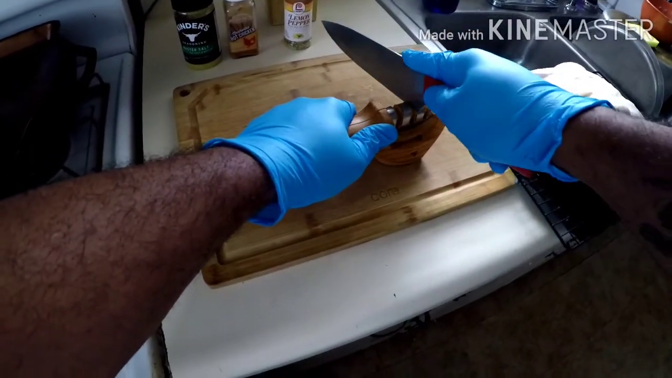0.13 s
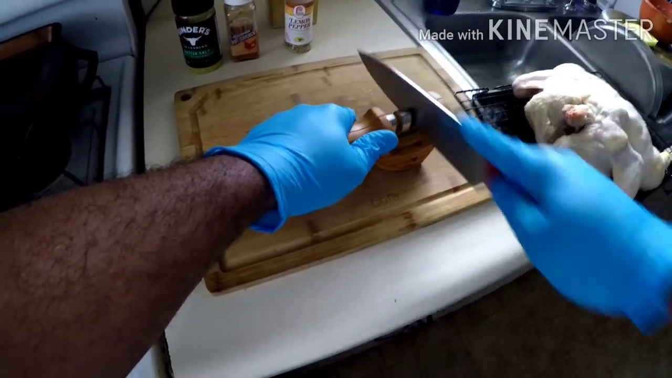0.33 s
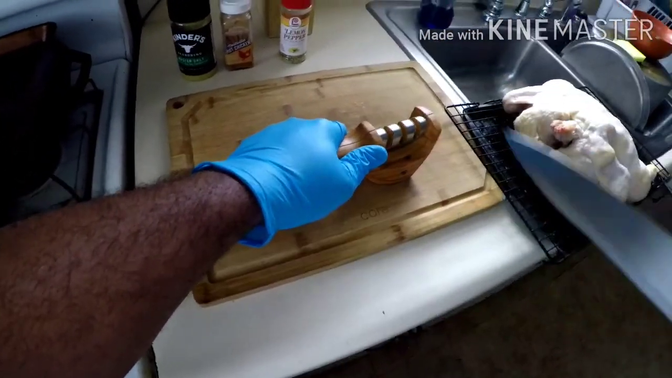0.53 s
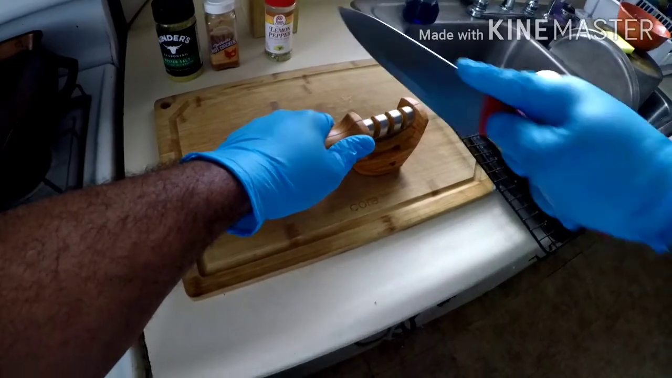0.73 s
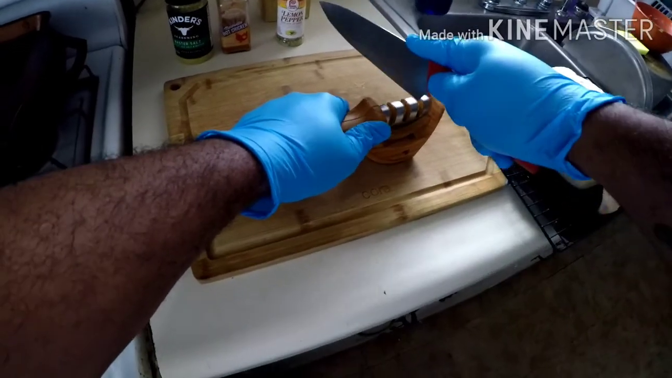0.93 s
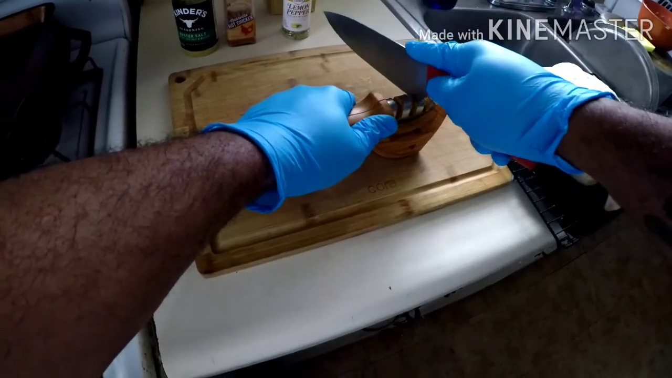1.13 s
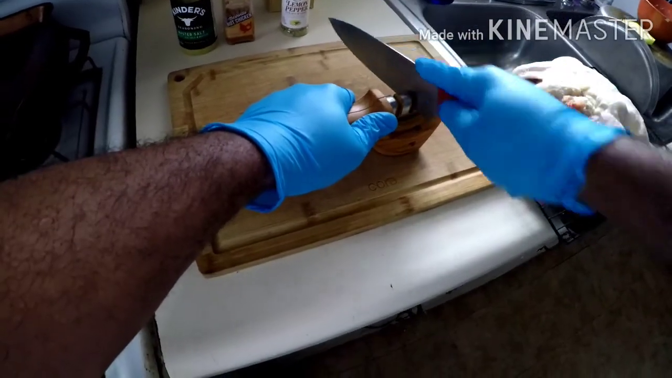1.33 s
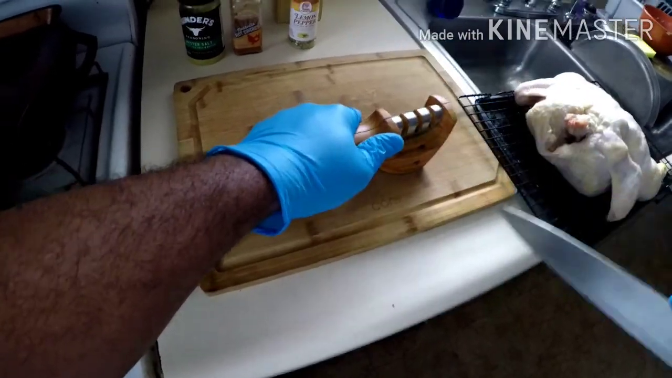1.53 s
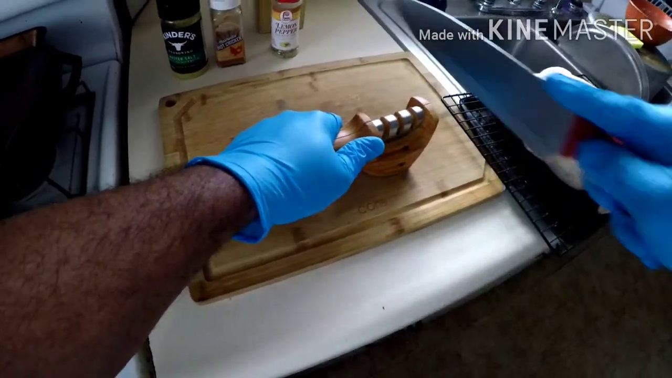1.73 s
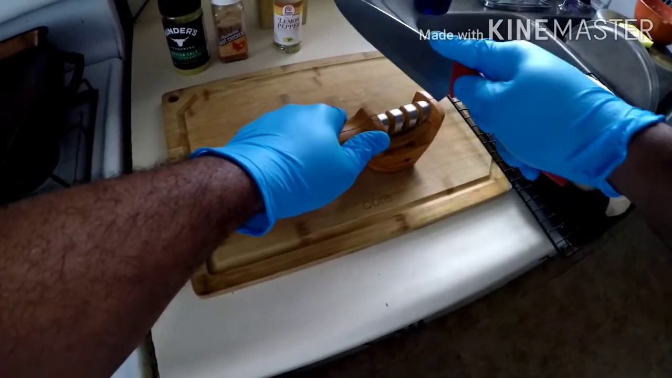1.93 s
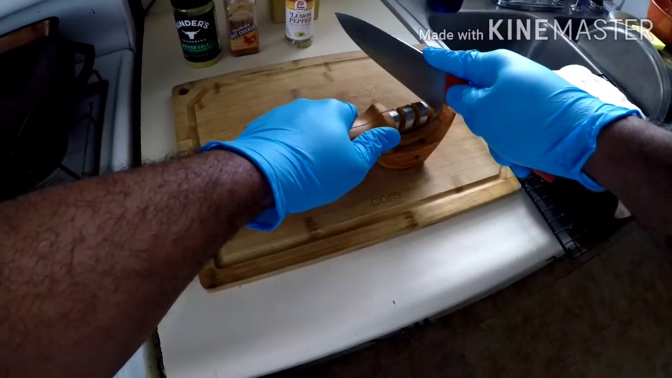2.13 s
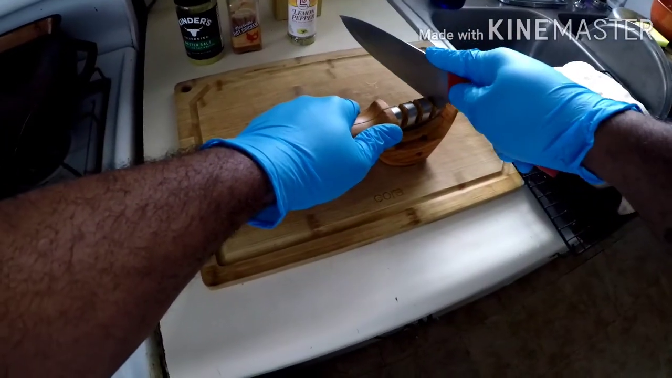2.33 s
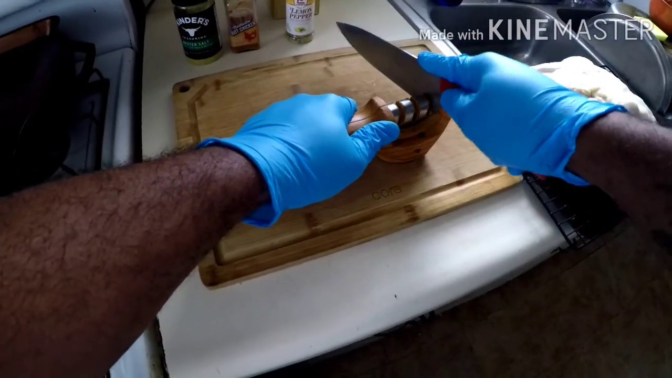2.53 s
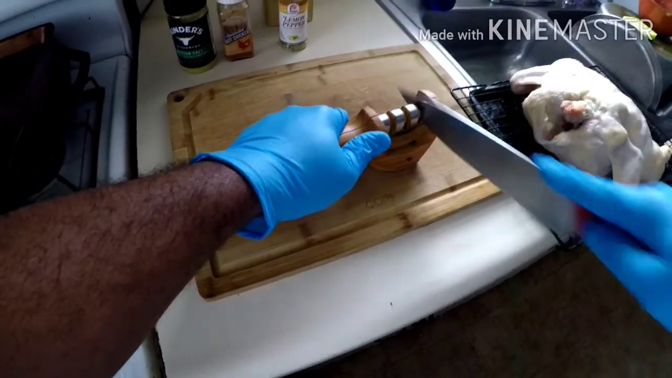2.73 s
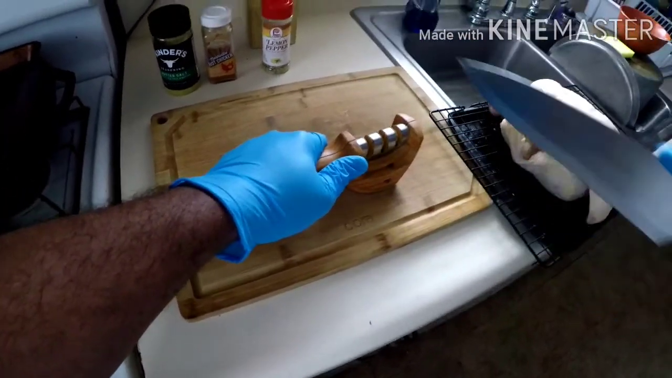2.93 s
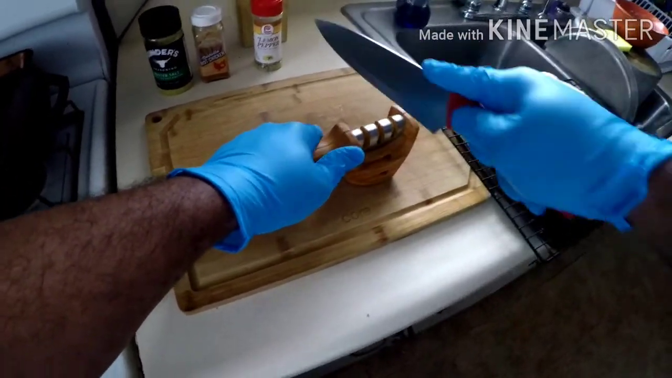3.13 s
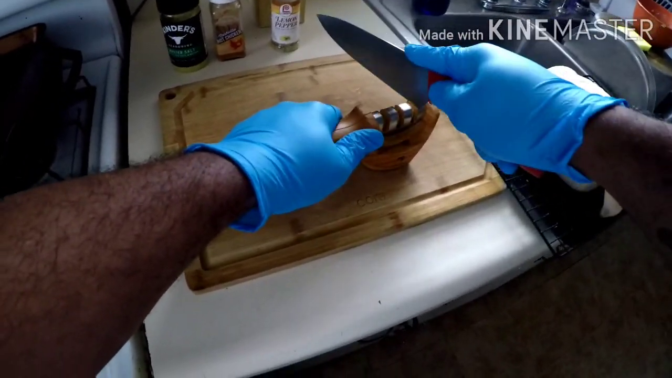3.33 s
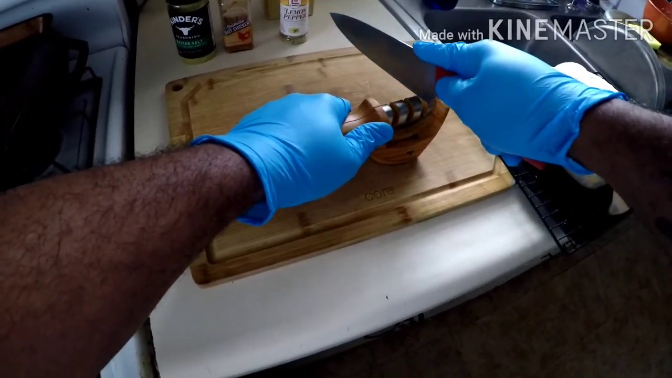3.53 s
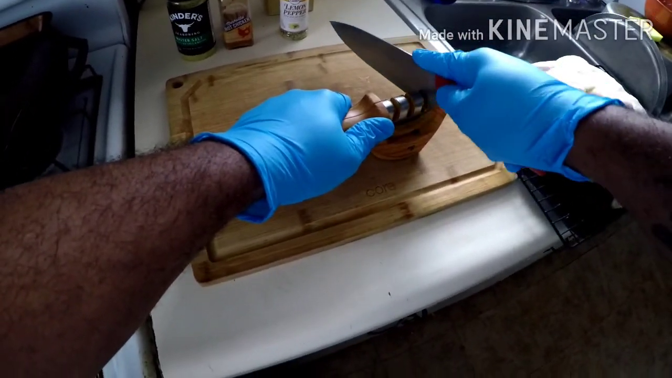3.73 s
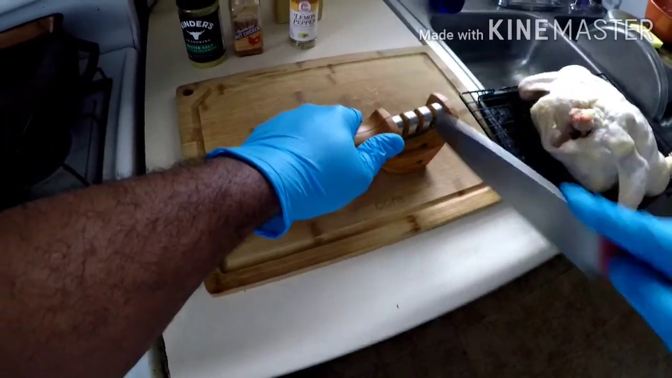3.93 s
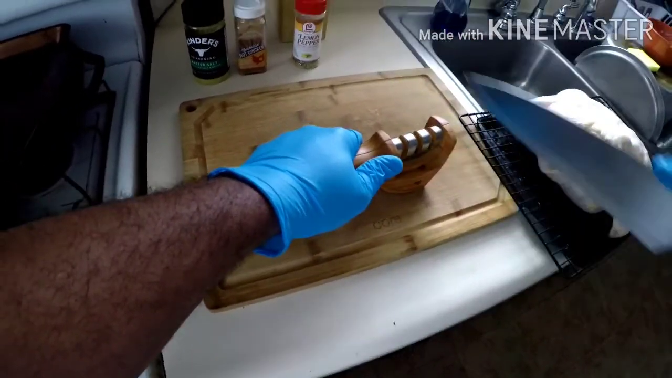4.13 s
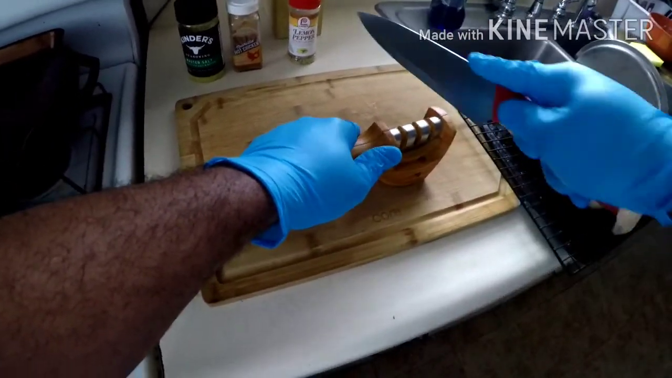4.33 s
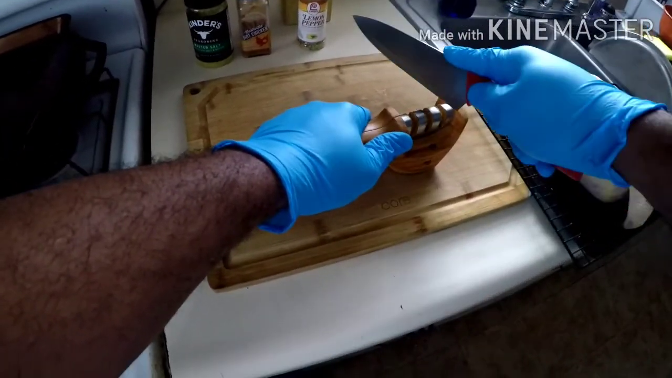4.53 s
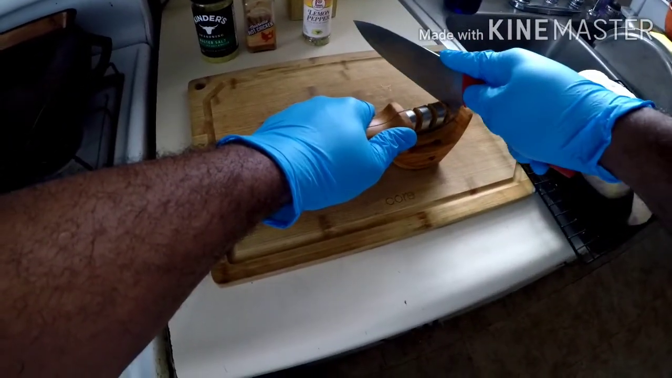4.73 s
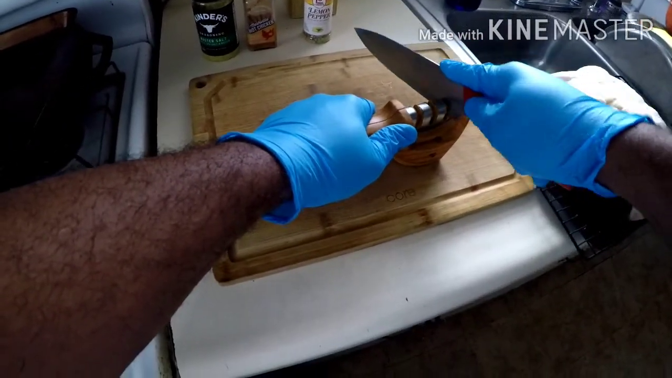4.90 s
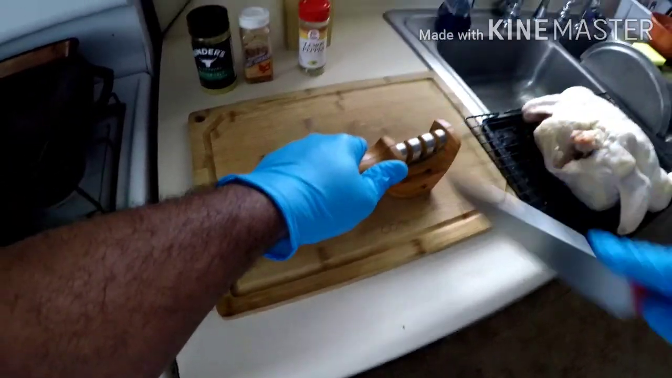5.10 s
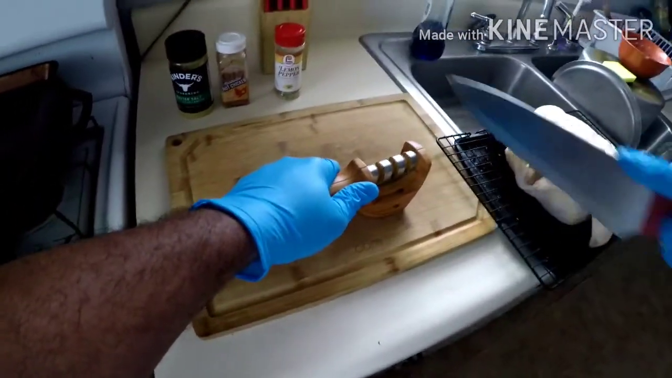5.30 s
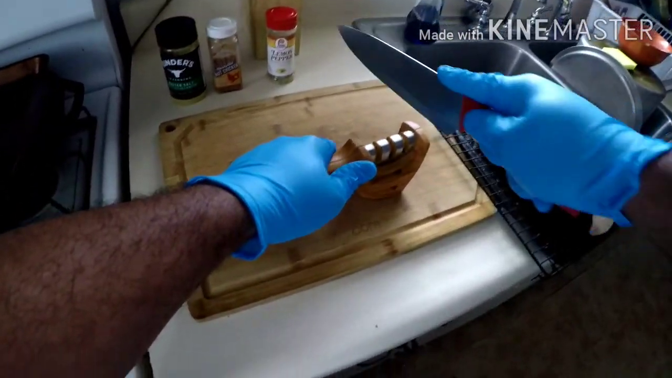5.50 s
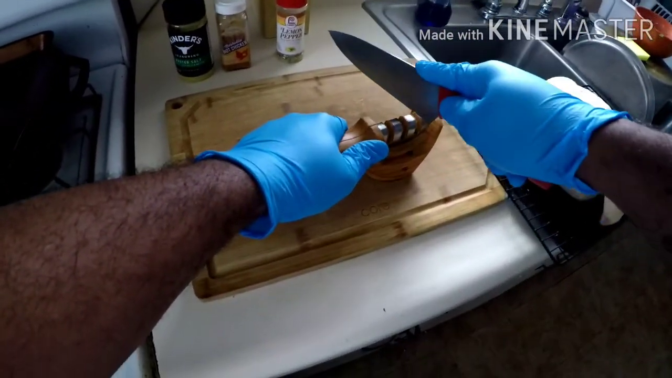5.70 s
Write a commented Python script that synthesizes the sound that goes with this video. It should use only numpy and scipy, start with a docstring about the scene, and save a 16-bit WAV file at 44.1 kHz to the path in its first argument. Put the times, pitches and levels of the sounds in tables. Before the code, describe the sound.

A kitchen knife is pulled five times through a small sharpener on a wooden board, each stroke a click and a short metallic rasp.

```python
"""Small kitchen: a knife is drawn five times through a pull-through sharpener held on a wooden board.
The blade knocks into the slot (filtered noise bursts and a rung pulse), then rasps: random grit slips
drive the resonances of steel, housing and board. A few sharp ticks are damped impulses.
The swinging arm rubs and bumps a body-worn camera: shaped grit and soft pushes. Noise makes the
air and hiss; a diffuse decaying tail makes the room."""
import sys
import numpy as np
from scipy import signal
from scipy.fft import rfft, irfft, next_fast_len
from scipy.io import wavfile
from scipy.ndimage import map_coordinates

SR = 44100
rng = np.random.default_rng(int(sys.argv[2]) if len(sys.argv) > 2 else 0)


def transcribe(signal):
    """Save signal, clipped to [-1, 1], as a 16-bit WAV file at the path in sys.argv[1]."""
    frames = np.atleast_2d(signal).T
    limited = np.clip(frames, -1, 1)
    pcm = np.round(limited * 32767).astype(np.int16)
    wavfile.write(sys.argv[1], SR, pcm)


N = 253971

# Events; levels are relative, before the mix, and laws (below) modify the gestures.
# Pulls. Each row: blade touch in seconds, run-up to full pressure in seconds, swell in dB/s, hold in seconds,
# light sliding in dB, edge rasp in dB, blade ring in dB, housing in dB, board in dB, housing tone in Hz.
PULLS = [(0.273, 0.061, 382, .078, -25, -23.6, -32.5, -32.7, -30.5, 744),
         (1.298, 0.1, 260, 0.069, -23, -20.5, -26.5, -30, -30.5, 746),
         (2.552, .185, 135, .044, -20, -29, -27.8, -33, -28.5, 1270),
         (3.724, .178, 340, .038, -23.5, -25.5, -25.5, -28.3, -32.5, 1230),
         (4.896, 0.15, 352, .048, -29, -24.8, -24, -29.5, -32.5, 1400)]
# Arm swings. Each row: start in seconds, time to fastest in seconds, hold in seconds, rubbing in dB.
SWINGS = [(0.508, 0.24, 0.086, -48.5), (1.565, .23, 0.074, -52.5), (2.848, 0.3, 0.063, -49),
          (4.06, .23, .12, -53), (5.223, .22, .125, -50)]
# Blade meets slot. Each row: time in seconds, edge click in dB, housing clack in dB, board knock in dB.
CONTACTS = [(0.2618, -18, -30, -24.5), (1.2717, -42, -39.5, -38.5), (1.3204, -22, -32, -29.5),
            (2.575, -23.5, -26.5, -29.5), (3.723, -48, -38, -43), (3.7665, -30.5, -31, -31),
            (4.9022, -23, -33.5, -27)]
# Tip slips off or steel ticks. Each row: start in seconds, peak in dB, base pitch in Hz.
TICKS = [(1.5, -5.5, 5200), (1.7079, -19, 4700), (2.799, -27, 2700), (4.688, -28, 1050)]
# Bumps on the camera mount. Each row: time in seconds, push peak in dB, scuff in dB.
BUMPS = [(0.516, -21, -47.5), (0.79, -29.5, -49), (0.933, -46, -48), (1.021, -36, -57), (1.536, -25.5, -45),
         (1.778, -37, -65), (1.861, -33, -46), (2.049, -38, -52), (2.392, -45, -49), (2.4403, -23, -46.5),
         (2.515, -24.5, -44.5), (2.885, -40, -45), (3.091, -32, -60), (4.137, -33.5, -48.5),
         (4.29, -33.5, -50.5), (4.338, -31, -60), (4.371, -29, -55), (4.425, -35, -48)]
# Edge bites, one resonance sings out. Each row: centre in seconds, length in seconds, pitch in Hz, level in dB.
BITES = [(0.338, 0.014, 6400, -30), (0.39, 0.024, 3700, -26), (1.408, 0.0073, 6060, -24),
         (1.42, .05, 755, -36), (1.443, 0.023, 3580, -25.5), (2.73, 0.042, 2900, -35.5),
         (2.736, .043, 1270, -34), (3.885, .02, 3700, -30.5), (3.937, 0.05, 2860, -35),
         (5.048, 0.018, 3220, -28.5)]

# Resonances. Each row: centre in Hz, width in Hz, level in dB.
# In order: board knock, sharpener housing, blade, edge, rasped board, camera mount, camera shell.
KNOCK_MODES = [(183, 32, 4.5), (300, 54, -4), (352, 32, -4), (497.6, 23, 2.5), (805, 41, -4),
               (970, 120, -9), (1720, 130, -7)]
HOUSING_MODES = [(514, 44, 3.8), (681, 35, 1), (737, 60, -6.5), (1000, 230, -2), (1137, 32, -6.5),
                 (1303, 43, 5.5), (1705, 55, -10.5), (2187, 190, -11.5)]
BLADE_MODES = [(2470, 380, -1.5), (2938, 30, 8.5), (3100, 28, 9.5), (3270, 23, 5.5), (3380, 48, 1),
               (3800, 20, -2), (4190, 20, 0), (3450, 410, -29)]
EDGE_MODES = [(5240, 16, -10), (5590, 32, 4), (5950, 30, 3.5), (6356, 40, 3), (6980, 30, 1), (6930, 64, -4)]
BOARD_MODES = [(167.6, 30, 7.5), (234, 72, -9.5), (279, 62, 1.5)]
MOUNT_MODES = [(161, 12, -8), (183.6, 78, 1.5), (257, 56, -3.5)]
SHELL_MODES = [(326, 108, 1), (682, 1200, -8), (1340, 80, -1.5), (1780, 410, -3.5), (2137, 197, 5),
               (3050, 200, 1.5)]

# Spectra of edge rasp, rubbing, and air with hiss. Each row: frequency in Hz, relative level in dB.
EDGE_SPECTRUM = [(300, -6), (600, -7.5), (2000, -8.5), (4800, -4), (5700, -1.5), (7200, 0.5), (8100, -7),
                 (10500, -8.5), (13000, -16), (14300, -47), (15200, -53)]
RUB_SPECTRUM = [(100, -30), (200, 4), (2400, -2), (3400, -7), (4600, -11.5), (6500, -5.5), (9000, -22),
                (13000, -28)]
HUSH_SPECTRUM = [(25, -2.5), (80, -8.5), (160, 1), (310, -2.5), (400, -4), (500, -6), (660, -12),
                 (1600, -17), (2500, -21.5), (4600, -28), (6300, -26), (10000, -27), (12500, -35),
                 (15000, -44)]
# Grit reaching one port alone. Each row: frequency in Hz, level in dB.
ONE_PORT_GRIT = [(200, -14), (700, -5), (2500, -6), (4000, -2), (8500, -1), (11000, -7)]
# Ringing parts radiate little at the very top. Each row: frequency in Hz, gain in dB.
RING_COLOUR = [(7000, 0), (11000, -9), (14000, -15)]
# Left phase lead at the ports. Each row: frequency in Hz, lead in radians.
PORT_LEAD = [(200, -.4), (500, -.7), (750, -1.8), (1000, -3.6), (1400, -3.2), (1750, 0), (2000, -.7),
             (2600, .5), (3200, 0), (5500, 0), (7200, -.4), (8200, -1.4), (9900, 0)]
# Port level difference. Each row: frequency in Hz, left minus right in dB.
PORT_TILT = [(200, -4.5), (400, 7), (550, 3.5), (800, 8), (1150, -10.5), (1500, 5), (2200, -1),
             (3500, -4.5), (5800, 2), (8700, -4.5), (11000, -2)]
# Left-right likeness of hush and rubbing. Each row: frequency in Hz, correlation from -1 to 1.
HUSH_ALIKE = [(60, .6), (200, 0.11), (700, 0.014), (2000, 0.026), (10000, 0.027)]
RUB_ALIKE = [(200, 0.24), (400, -0.94), (750, -0.962), (1300, -0.944), (2300, -0.19), (4400, 0.97)]
# Room decay. Each row: frequency in Hz, t60 in seconds.
KITCHEN_T60 = [(200, 0.73), (1000, 0.16), (3500, 0.37), (7000, 0.44), (13000, 0.33)]

# How each part follows a gesture. Each law: lead of full pressure in seconds, share of the swell rate,
# fade in dB/s, extra dB while sliding lightly.
EDGE_LAW = (0, 1.17, 300, -4.5)
BLADE_LAW = (-0.02, 1.4, 340, -2)
HOUSING_LAW = (0.026, 1.63, 132, 5.1)
BOARD_LAW = (0.05, 0.7, 143, 0)
SWING_LAW = (0, 1, 188, -3)

TOP_HZ = 14900  # band limit
BOARD_HZ = 193  # steady board tone in Hz
TONE_DB = -6.5  # housing tone, relative to the housing gesture
SEAT_S = 0.0023  # onset of each gesture; the edge settling on the abrasive
BOARD_DELAY_S, BOARD_LINGER_S, BOARD_LIGHT_DB = 0.024, 0.069, -2.5  # board hum starts late, holds longer
SWING_DB_PER_S, SLOW_RUB_DB = 95, -13.5  # swell with arm speed; slow rubbing, before the law's extra dB
GRAZE_S, GRAZE_DB = 0.007, -17  # edge brushes the slot wall around seating; dB relative to the snap


def amp(db):
    """Decibels to gain."""
    return 10 ** (np.asarray(db) / 20)


def unit(x):
    """Scale to rms 1."""
    return x / np.sqrt(np.mean(x ** 2) + 1e-20)


def peaked(x):
    """Scale to peak 1."""
    return x / np.abs(x).max()


def along(points, hz):
    """Interpolate (Hz, value) points on a log frequency axis."""
    f, v = np.transpose(points)
    return np.interp(np.log(hz + 1), np.log(f), v)


def wobble(knots_per_s):
    """Smooth random curve through Gaussian knots."""
    knots = rng.standard_normal(int(N * knots_per_s / SR) + 4)
    return map_coordinates(knots, [np.arange(N) * knots_per_s / SR])


def filtered(x, response):
    """Multiply the spectrum of x by a complex response of frequency."""
    size = x.shape[-1]
    m = next_fast_len(size + SR // 4)
    return irfft(rfft(x, m) * response(np.fft.rfftfreq(m, 1 / SR)), m)[..., :size]


def coloured(x, spectrum):
    """Shape x by a (Hz, dB) spectrum."""
    return filtered(x, lambda f: amp(along(spectrum, f)))


def ring(x, modes):
    """Drive a parallel bank of damped resonances."""
    def response(f):
        return sum(amp(db) * 1j * f * w / (c * c - f * f + 1j * f * w) for c, w, db in modes)
    return filtered(x, response)


def ring_at(x, hz, width_hz):
    """One resonance, at rms 1."""
    return unit(ring(x, [(hz, width_hz, 0)]))


def add(track, start_s, sound):
    """Mix a sound into a track in place."""
    part = track[..., round(start_s * SR):][..., :sound.shape[-1]]
    part += sound[..., :part.shape[-1]]


def spread(pair, spectrum, alike):
    """Two unrelated signals become coloured stereo of given likeness, with mid at rms 1."""
    def response(f):
        turn = np.arccos(np.clip(along(alike, f), -1, 1)) / 2
        return amp(along(spectrum, f)) * np.array([np.ones_like(f), np.tan(turn)])
    mid, side = filtered(pair, response)
    return np.array([mid + side, mid - side]) / np.sqrt(np.mean(mid ** 2))


def grit(slips_per_s, spread_db):
    """Tiny slips at random moments, of random sign and unequal size, at rms 1."""
    slips = rng.random(N) < slips_per_s / SR
    sizes = amp(spread_db * np.clip(rng.standard_normal(N), -2.5, 2.5))
    return unit(slips * rng.choice([-1, 1], N) * sizes)


def gesture(start_s, run_up_s, swell_db_per_s, hold_s, light_db, law):
    """Gain of one hand movement: light contact, swell to full pressure, hold, fade."""
    lead_s, share, fade_db_per_s, extra_db = law
    t = np.arange(N) / SR - start_s
    full_s = run_up_s - lead_s
    early = np.maximum(full_s - t, 0)
    late = np.maximum(t - full_s - hold_s, 0)
    light = amp(min(light_db + extra_db, 0))
    pressure = light + (1 - light) * amp(-share * swell_db_per_s * early)
    return np.clip(t / SEAT_S, 0, 1) * pressure * amp(-fade_db_per_s * late)


def hush():
    """Steady kitchen air and microphone hiss, as noise whose low end wavers."""
    air = spread(rng.standard_normal((2, N)), HUSH_SPECTRUM, HUSH_ALIKE)
    low = coloured(air, [(400, 0), (900, -29)])
    waver = amp(0.36 * wobble(2.94) + 2.5 * wobble(18))
    return amp(-48.5) * (air + low * (waver - 1))


def contacts():
    """Steel clicks into the slot, clacks the housing and knocks it against the board."""
    out, t = np.zeros((2, N)), np.arange(SR // 3) / SR
    knock = peaked(ring(t * np.exp(-t / 0.00015), KNOCK_MODES))
    before_s = 0.03
    early, late = np.maximum(before_s - t, 0), np.maximum(t - before_s, 0)
    snap_and_skid = amp(-60 * late / 0.015) + amp(-19 - 60 * late / 0.12)
    snap = (1 - np.exp(-late / 0.0014)) * snap_and_skid
    graze = amp(GRAZE_DB) * snap.max() * np.exp(-(early + late) / GRAZE_S)
    for s, click_db, clack_db, knock_db in CONTACTS:
        crack = rng.standard_normal(len(t)) * (snap + graze)
        click = coloured(coloured(crack, EDGE_SPECTRUM), [(7000, 0), (12000, -6)])
        body = ring(crack, HOUSING_MODES) + amp(-12.5) * ring(crack, BLADE_MODES)
        clack = coloured(body, [(3600, 12), (9000, -21)])
        add(out, s - before_s, amp(click_db) * peaked(click) + amp(clack_db + 9.5) * peaked(clack))
        add(out, s + 0.00395, amp(knock_db + 13.0) * knock)
    return out


def sliding(force, modes, shift_db):
    """As the contact point travels, each mode is driven now more, now less; rms 1."""
    def drive():
        return force * amp(shift_db * np.tanh(wobble(22.03)))
    return unit(sum(ring(drive(), [mode]) for mode in modes))


def rasp():
    """The edge catches on abrasive grains; the same chattering force rings every part."""
    t = np.arange(N) / SR
    chatter = amp(1.2 * wobble(110) + 1.2 * wobble(400))
    shared, *flanks = [grit(slips_per_s=8000, spread_db=3.0) for _ in range(3)]
    # each blade flank faces its own port
    force = unit(chatter * (shared + coloured(np.array(flanks), ONE_PORT_GRIT)))

    edge = blade = housing = board = singing = 0
    for s, run_up, swell, hold, light_db, edge_db, blade_db, housing_db, board_db, tone_hz in PULLS:
        pull = (s, run_up, swell, hold, light_db)
        edge = edge + amp(edge_db) * gesture(*pull, EDGE_LAW)
        blade = blade + amp(blade_db) * gesture(*pull, BLADE_LAW)
        strain = amp(housing_db) * gesture(*pull, HOUSING_LAW)
        housing = housing + strain
        singing = singing + amp(TONE_DB) * strain * ring_at(force, tone_hz, 160)
        board_pull = (s + BOARD_DELAY_S, run_up, swell, hold + BOARD_LINGER_S, BOARD_LIGHT_DB)
        board = board + amp(board_db) * gesture(*board_pull, BOARD_LAW)
    for s, length_s, hz, db in BITES:
        bite = amp(db) * np.exp(-((t - s) / length_s) ** 2)
        singing = singing + bite * ring_at(force, hz, 60 + 0.1 * hz)

    scrape = edge * unit(coloured(force, EDGE_SPECTRUM))
    zing = sliding(force, EDGE_MODES, shift_db=5)
    clang = sliding(force, BLADE_MODES, shift_db=5)
    steel = amp(-11.5) * edge * zing + amp(-7) * blade * clang
    shell = amp(-1.0) * housing * sliding(force, HOUSING_MODES, shift_db=6.5)
    # a steady board tone, wavering in phase and level
    groan = np.sqrt(2) * np.sin(2 * np.pi * BOARD_HZ * t + wobble(28)) * amp(1.3 * wobble(45))
    hum = board * (amp(-4) * groan + amp(-7.5) * unit(ring(force, BOARD_MODES)))
    return scrape + hum + coloured(steel + shell + singing, RING_COLOUR)


def ports(x):
    """Board and camera body give each port its own phase and strength."""
    sides = np.array([[1], [-1]]) / 2
    left_only = np.array([[1], [0]])

    def response(f):
        return amp(sides * along(PORT_TILT, f)) * np.exp(1j * left_only * along(PORT_LEAD, f))
    return filtered(x, response)


def kitchen(x):
    """Diffuse noise tail for each ear, 5 ms late, its decay time set by frequency."""
    hz, t, z = signal.stft(rng.standard_normal((2, SR // 2)), SR, nperseg=256)
    decay = amp(-60 * t / along(KITCHEN_T60, hz)[:, None])
    tail = signal.istft(z * decay, SR, nperseg=256)[1]
    tail = np.pad(tail / np.linalg.norm(tail[0]), ((0, 0), (SR // 200, 0)))
    wet = signal.fftconvolve(x, tail, axes=1)[:, :N]
    return coloured(wet, [(200, -6.5), (700, 3), (7000, -5.0), (12000, -10)])


def handling():
    """Clothing rubs the camera's shell, and bumps its mount with a soft push and a short scuff."""
    t, pushes, scuffs = np.arange(SR // 8) / SR, np.zeros(N), np.zeros(N)
    thud = peaked(ring(t ** 3 * np.exp(-t / 0.0006), MOUNT_MODES))
    swell = (t / 0.007) * np.exp(1 - t / 0.007)
    for s, push_db, scuff_db in BUMPS:
        add(pushes, s + 0.0033, amp(push_db + 1) * thud)
        add(scuffs, s - 0.001, amp(scuff_db + 0.5) * swell)
    rubbing = 0
    for s, run_up, hold, db in SWINGS:
        rubbing = rubbing + amp(db) * gesture(s, run_up, SWING_DB_PER_S, hold, SLOW_RUB_DB, SWING_LAW)
    level = np.hypot(amp(2.0 + 2.1 * wobble(25)) * rubbing, scuffs)
    fibres = np.array([grit(slips_per_s=4500, spread_db=3.0) for _ in range(2)]) * amp(1.7 * wobble(70))
    rustle = spread(ring(fibres, SHELL_MODES), RUB_SPECTRUM, RUB_ALIKE)
    rumble = spread(ring(fibres, MOUNT_MODES), [(300, 28), (900, -20)], [(200, 0.0), (400, 0.35)])
    return (level * (rustle + amp(2.0) * rumble) + pushes) * amp([[-1], [1]])


def ticks():
    """Single snaps through a pair of heavily damped resonances, twice, then one broad resonance."""
    out, snap = np.zeros(N), signal.unit_impulse(SR // 20)
    for s, db, hz in TICKS:
        body = [(hz, 0.4 * hz, 0), (1.55 * hz, 0.5 * hz, -1)]
        rung = ring(ring(snap, body), body)
        add(out, s, amp(db) * peaked(ring(rung, [(1.06 * hz, 3000, 0)])))
    return out


def scene():
    """Knife and sharpener in the room, with handling noise close by."""
    knife = rasp() + contacts() + ticks()
    return amp(-1.0) * ports(knife) + amp(-7) * kitchen(knife) + handling() + hush()


def record(dry):
    """The camera sheds deep bass steeply and keeps nothing above its band limit."""
    thinned = coloured(dry, [(50, -14.0), (80, -22.5), (100, -23), (120, -17.5), (140, -1)])
    return filtered(thinned, lambda f: f < TOP_HZ)


dry = scene()
out = record(dry)
transcribe(out)
```